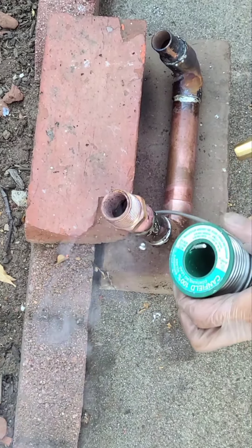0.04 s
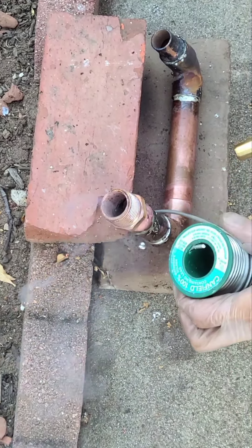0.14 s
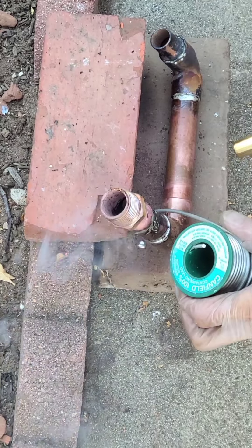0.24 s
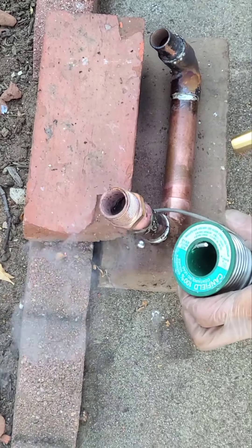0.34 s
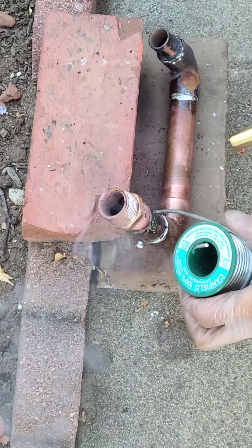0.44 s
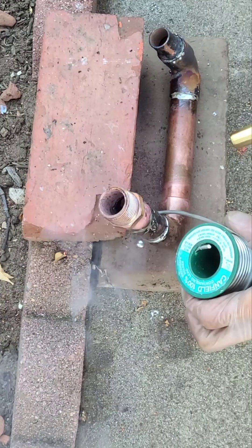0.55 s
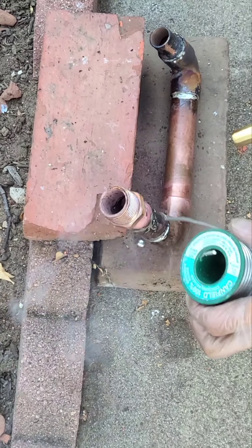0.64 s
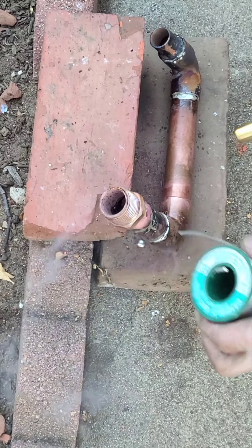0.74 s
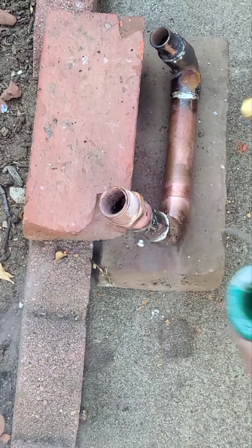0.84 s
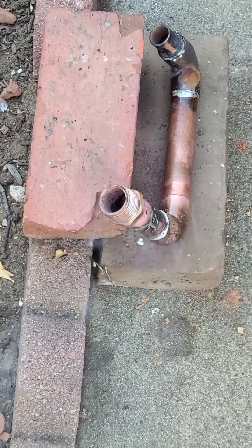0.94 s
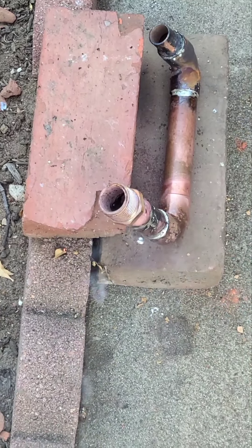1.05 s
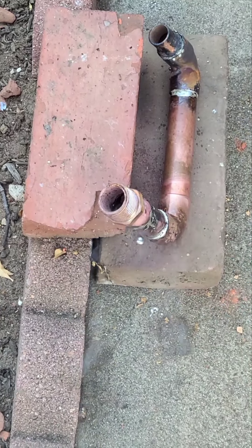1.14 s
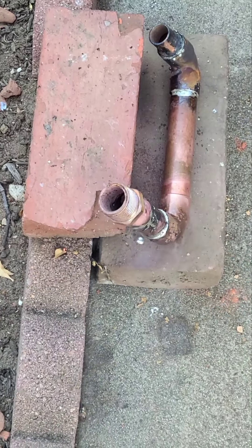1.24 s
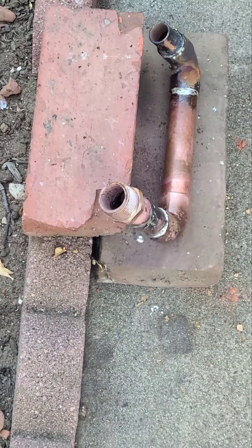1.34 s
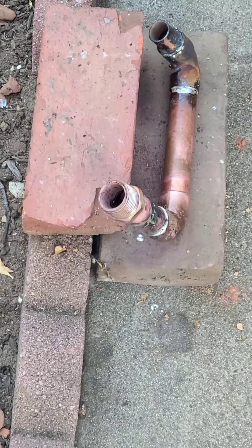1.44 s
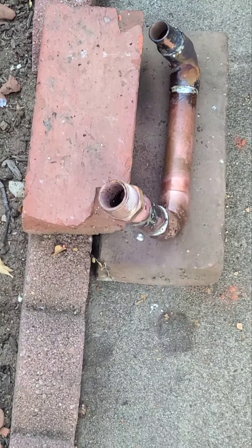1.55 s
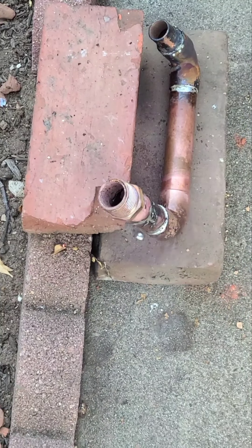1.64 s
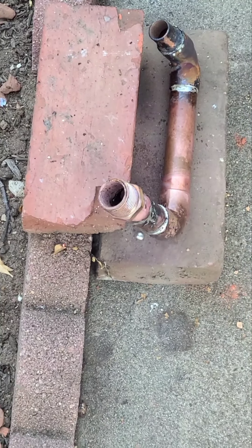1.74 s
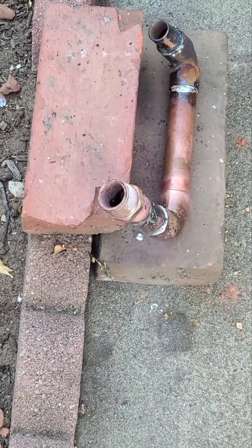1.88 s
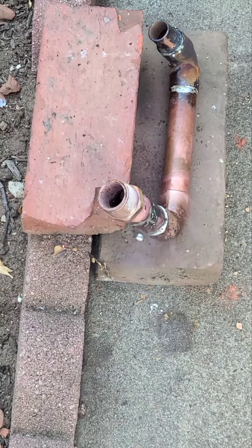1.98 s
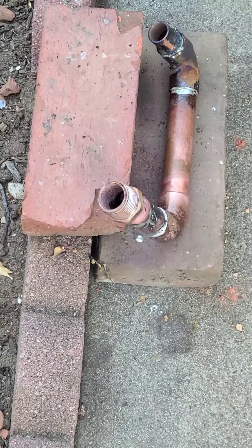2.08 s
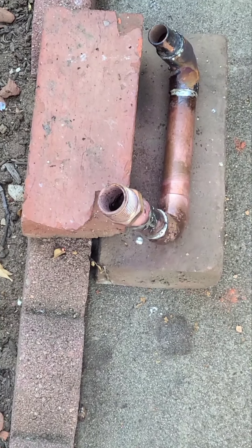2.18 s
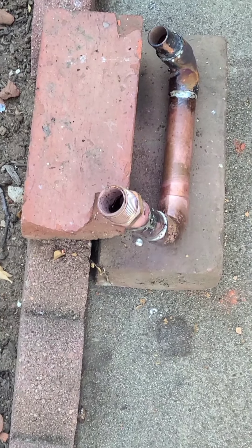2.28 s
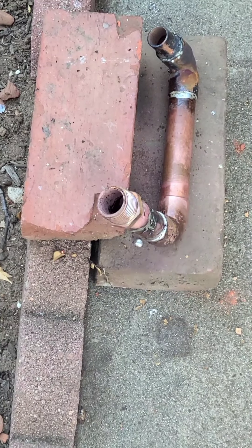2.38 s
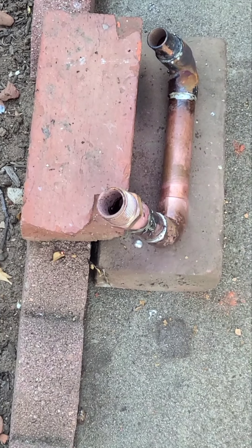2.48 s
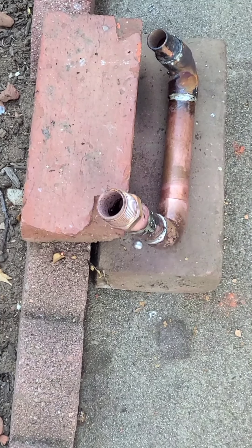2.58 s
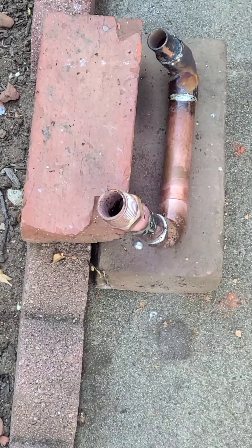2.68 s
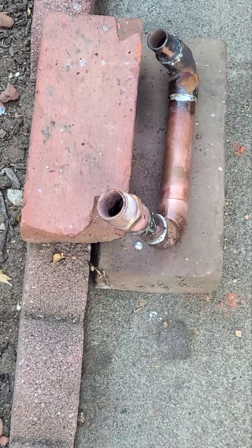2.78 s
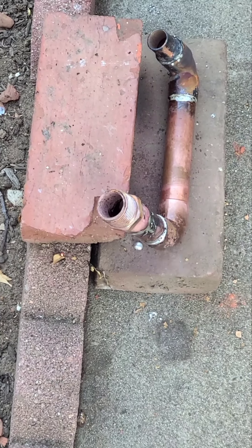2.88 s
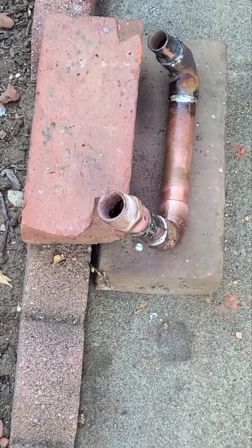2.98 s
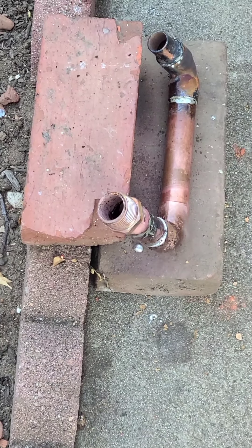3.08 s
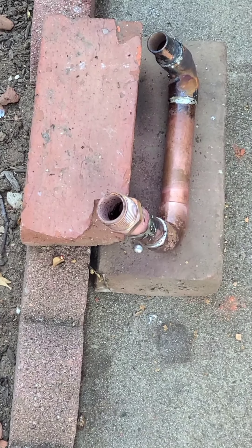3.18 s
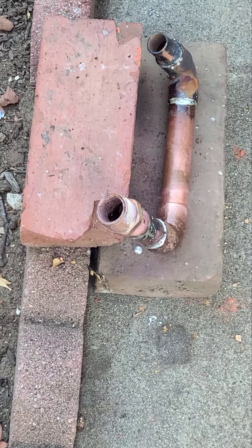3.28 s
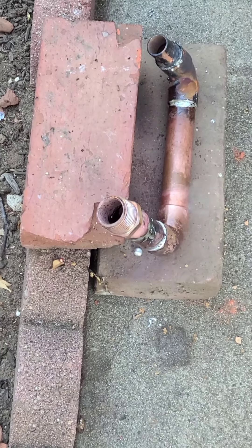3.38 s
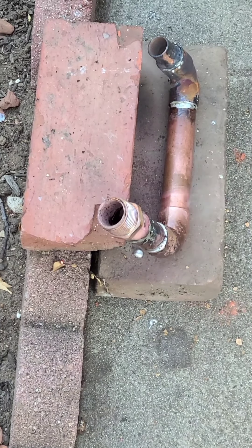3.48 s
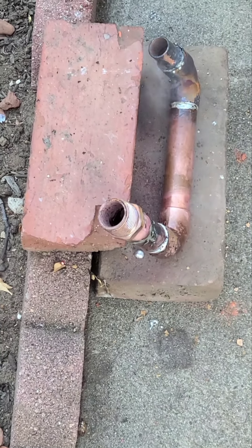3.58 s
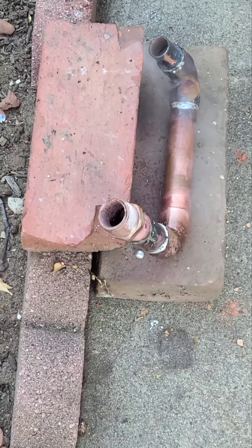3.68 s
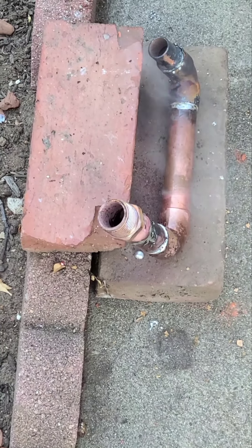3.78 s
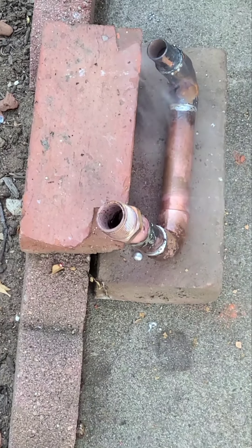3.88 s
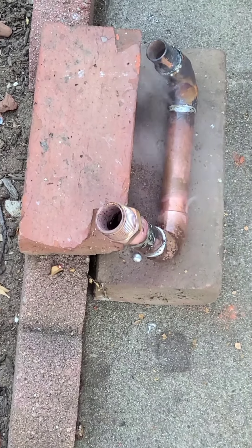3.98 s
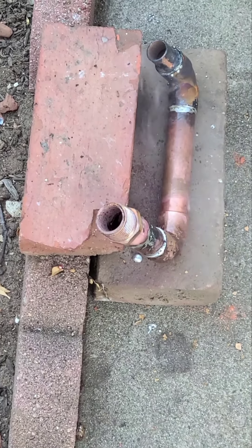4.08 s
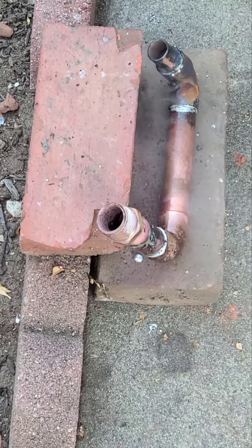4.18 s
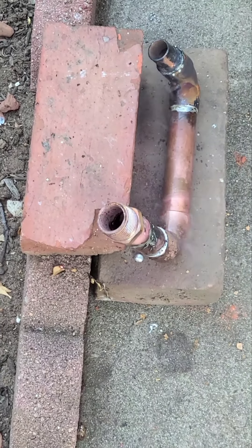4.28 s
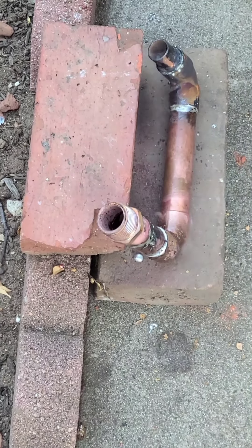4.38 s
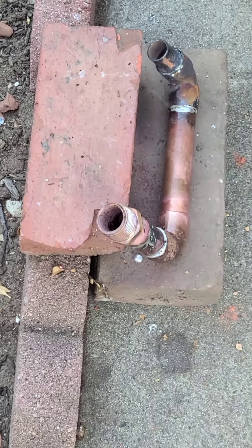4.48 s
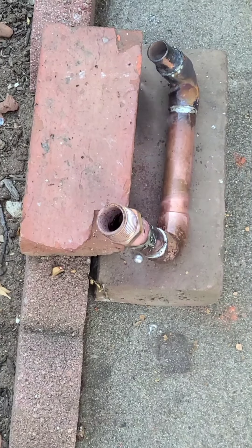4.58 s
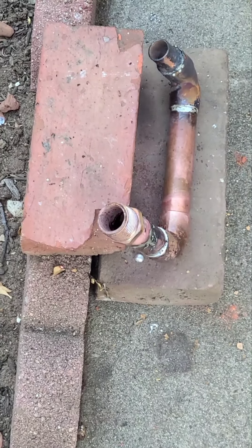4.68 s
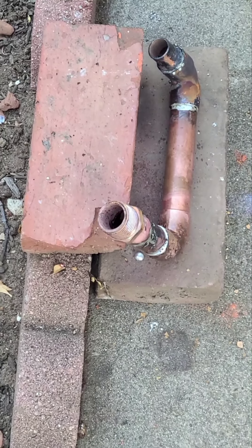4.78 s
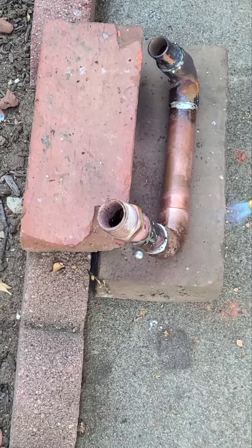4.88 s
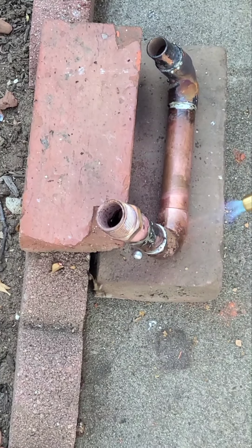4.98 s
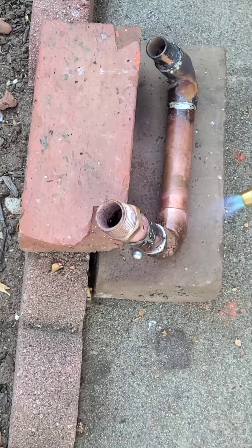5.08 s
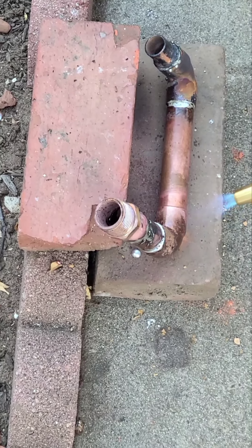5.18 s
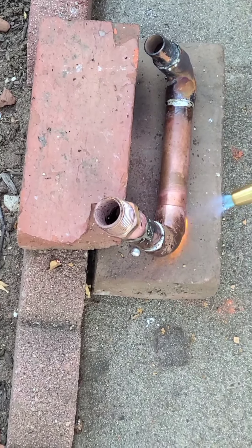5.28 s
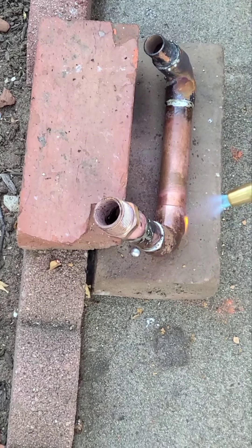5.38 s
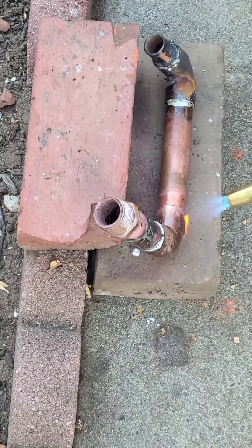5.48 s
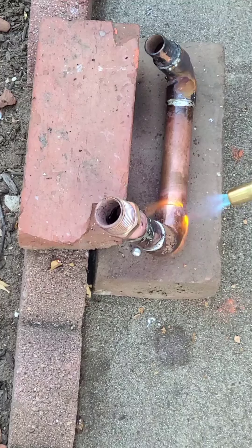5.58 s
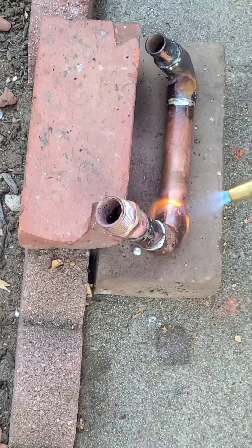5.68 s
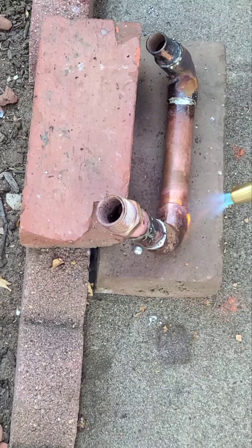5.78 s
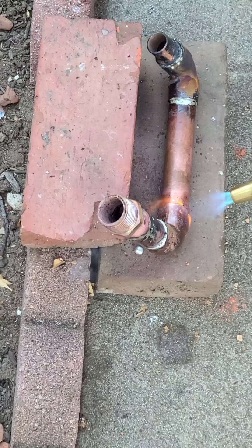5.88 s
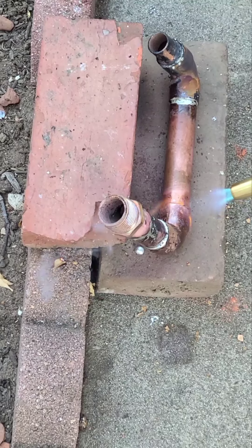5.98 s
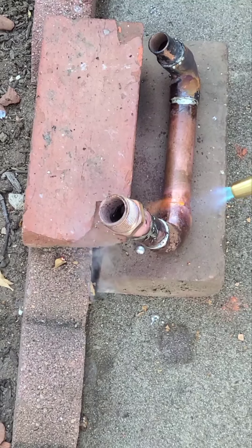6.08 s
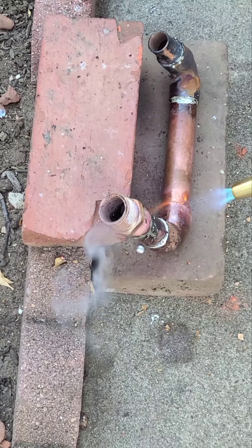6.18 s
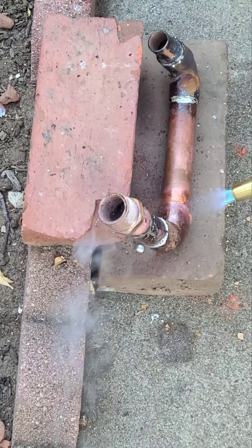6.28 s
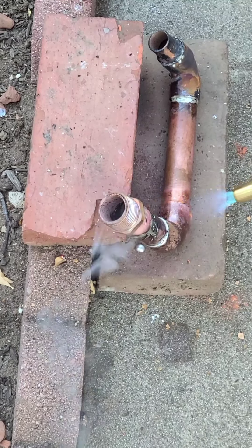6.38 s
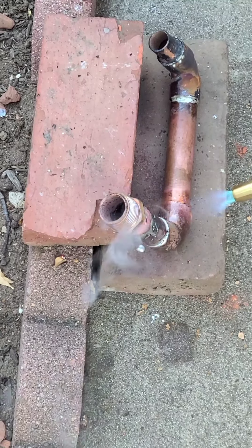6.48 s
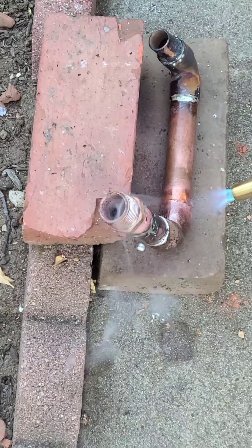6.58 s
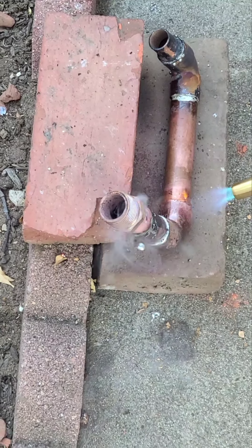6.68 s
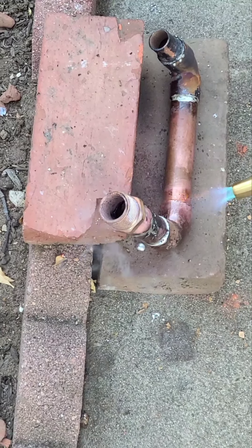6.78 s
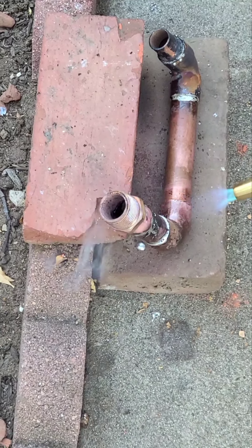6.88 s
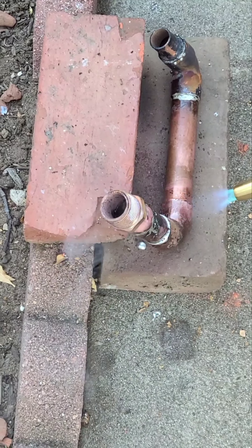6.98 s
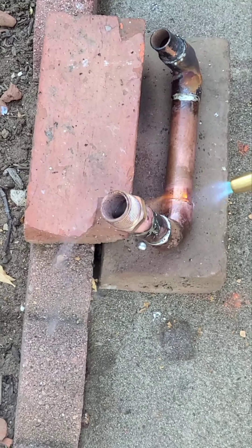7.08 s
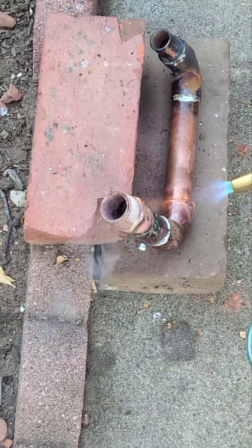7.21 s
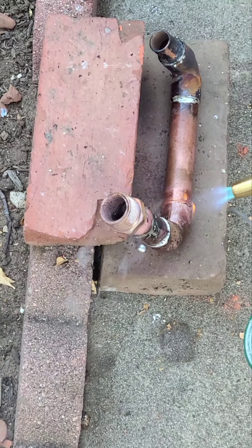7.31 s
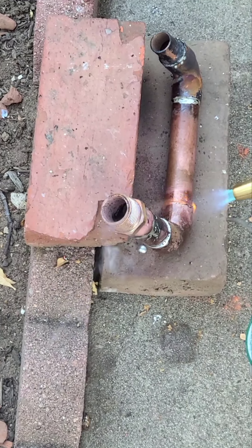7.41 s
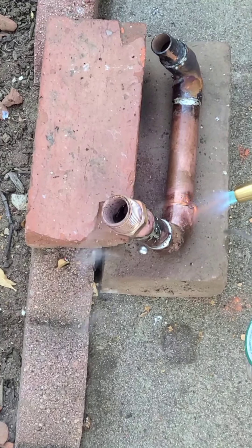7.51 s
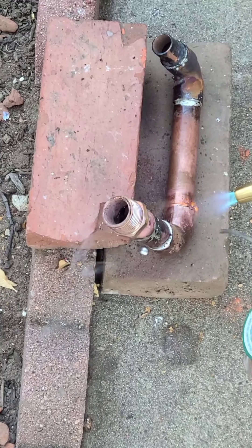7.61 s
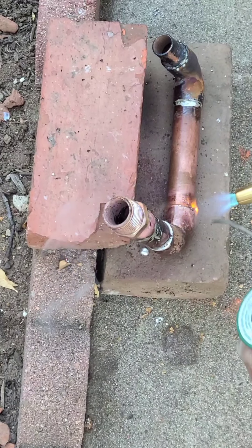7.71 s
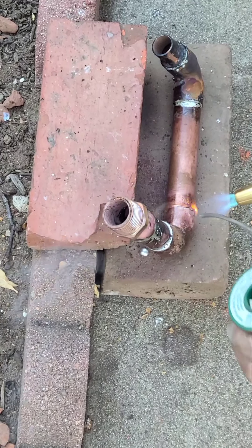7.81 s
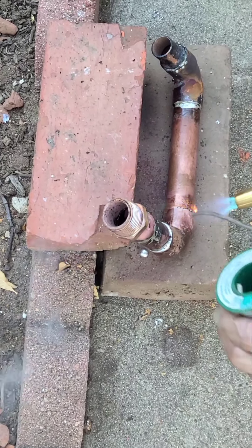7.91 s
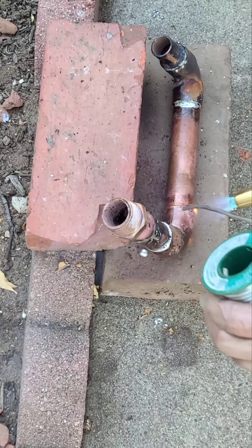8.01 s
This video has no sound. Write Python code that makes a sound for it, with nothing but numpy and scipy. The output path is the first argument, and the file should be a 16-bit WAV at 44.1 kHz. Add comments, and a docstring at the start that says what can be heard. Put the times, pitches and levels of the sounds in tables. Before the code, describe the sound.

Quiet distant traffic rumble, sharp close clatter and small metallic clicks, a thin gas hiss, an igniter snap with a thump, then a loud steady torch roar.

```python
"""A low town rumble comes first, far off and from all sides, as shaped noise with a faint wavering whine.
Close to a stereo pair of microphones, a solder spool clatters down and a gas torch is picked up with clicks:
short noise cracks through resonances, among dry ticks and gritty scuffs. The valve opens with a thin hiss,
the igniter snaps and the gas catches with a thump, a sinking sine. The flame, noise in three bands, grows
louder as it is brought near and roars against a copper joint between a brick and a paving slab."""
import sys
import numpy as np
from scipy import signal
from scipy.fft import rfft, irfft, next_fast_len
from scipy.io import wavfile
from scipy.ndimage import uniform_filter1d

SR = 44100
rng = np.random.default_rng(int(sys.argv[2]) if len(sys.argv) > 2 else 0)


def store_wav(level_fs):
    """Save 16-bit WAV to argv[1]."""
    pcm = np.round(np.clip(np.atleast_2d(level_fs), -1, 1) * 32767)
    wavfile.write(sys.argv[1], SR, pcm.T.astype(np.int16))


N = 355005
TIME = np.arange(N) / SR
HZ = np.fft.rfftfreq(1024, 1 / SR)  # bins of one noise frame
FRAME_S = np.arange(N // 256 + 5) * 256 / SR

# Spectrum of the distant town, relative: [f/Hz, level/dB]
TOWN_SPECTRUM = [(20, -11.5), (59, 1), (169, -13.5), (205, -10), (300, -21.5), (421, -21), (511, -24),
                 (760, -22.5), (1000, -28), (1310, -27.5), (1880, -40), (3010, -45), (4200, -53.5),
                 (15000, -83)]
# The town arrives from all sides of the pair: [f/Hz, left-right likeness 0-1]
TOWN_LIKENESS = [(100, .98), (260, .96), (500, .52), (850, .1), (8000, .15)]
# Far whine that comes and goes: [start t/s, end t/s, final f/Hz, level/dB before the town's channel trim]
WHINE_NOTES = [(2.33, 2.85, 557, -59), (2.88, 3.03, 559, -55), (3.07, 3.14, 560, -51),
               (3.88, 4.03, 571, -56), (4.13, 4.72, 579, -53.5)]
# Very faint background hiss, relative: [f/Hz, level/dB]
FAINT_HISS_SPECTRUM = [(4000, -16.5), (9000, -5.0), (13500, -3.5)]

# Gritty scuffs of handling: [t/s, level/dB before trims, length/s, rasp f/Hz]
SCUFF_EVENTS = [(0.717, -64.5, 0.065, 7000), (2.085, -60, 0.043, 8140), (2.38, -57.5, 0.043, 4040),
                (2.81, -55, 0.045, 7500), (2.898, -63.5, 0.076, 7500), (2.971, -55, 0.045, 3420),
                (3.29, -58, 0.024, 5000), (3.354, -62, 0.062, 7000), (3.782, -56, 0.04, 5220),
                (3.951, -59, 0.3, 8850), (4.137, -57.5, 0.064, 8000)]
# Spectrum of a scuff, relative: [f/Hz, level/dB]
SCUFF_SPECTRUM = [(1000, -27), (3200, 6), (6000, -2), (9000, -4.5), (14500, 3.5)]
# Dry ticks: [t/s, level/dB before the trim, decay/s]
TICK_EVENTS = [(2.3051, -56, .003), (2.354, -58, .002), (2.648, -56.5, .001), (2.9516, -57, .002),
               (2.9701, -57, .003), (3.1937, -55, 0.00091), (3.2857, -56, .002), (3.6326, -30, 0.00075),
               (3.7115, -49, .0008), (3.7196, -40.5, 0.001), (3.7688, -46, .002), (3.889, -31, 0.00066)]
# Body of a tick, relative: [f/Hz, level/dB]
TICK_BODY = [(300, -17), (1000, -6), (1300, 9), (1650, 3), (2200, -13.5), (2950, 2.5), (3500, -12),
             (4400, -6), (5300, -21), (6400, -9), (8300, -19), (10500, -25), (14500, -20)]

# Knocks of the spool: [t/s, level/dB before the trim, low body level/dB, crack decay/s, rattle level/dB,
# left minus right level/dB, contact ring f/Hz, contact ring level/dB]
SPOOL_KNOCKS = [(1.022, -49, -7, 0.0024, 1.5, 5.5, 6500, 8.5),
                (1.2458, -31, 16, 0.0011, -27.5, 1.5, 2900, 14),
                (1.2525, -42, 6, 0.0028, -5.5, 2, 2840, 14), (1.3250, -36, 9.5, 0.0037, -9, -3, 3000, -2.5),
                (1.3332, -12.5, -2, 0.0014, -17, -0.5, 2380, 7),
                (1.3432, -21.5, 2.5, 0.0016, -12.5, -2.5, 7000, 2.5),
                (1.3605, -12, -6.5, 0.0022, -21, 5.5, 6040, 4),
                (1.3642, -17, 1, 0.001, -18, -3.5, 2600, 8.5),
                (1.3742, -23.5, -4, 0.0012, -22.5, -8, 6000, 3),
                (1.3855, -26.5, 1, 0.0016, -19, -13, 14000, -3),
                (1.3948, -23, -1, 0.0033, -22.5, -0.5, 14000, 5),
                (1.4000, -28, 6.5, 0.0017, -13, 6, 12200, -2)]
# Resonances of the spool: [f/Hz, width f/Hz, relative level/dB]
SPOOL_MODES = [(1900, 90, 3), (2330, 260, 9), (2652, 70, 7), (2780, 40, 6), (2860, 330, 8), (2920, 70, 5),
               (4050, 400, 0), (5980, 160, 2), (6988, 70, 5), (7370, 90, 5), (8400, 120, 3),
               (10400, 170, 9), (12208, 110, 16), (13300, 400, 6), (14050, 160, 11), (14400, 200, 12)]
# Ring of the spool after its hardest blow: [f/Hz, relative level/dB, t60 t/s]
SPOOL_RING = [(860, 3, .25), (4247, 0, .33)]
# That blow: [t/s, level/dB]
SPOOL_JOLTS = [(1.3335, -47.5)]
# Clicks of the torch in the hand: same columns and units as SPOOL_KNOCKS
TORCH_CLICKS = [(1.6356, -13.5, -3.5, 0.0015, -24.5, 6, 4530, 6),
                (1.6380, -25, 14.5, 0.00052, -14.5, -3, 6100, 2),
                (1.673, -40.5, 13, 0.002, -4, 1, 2390, -3.5), (1.7046, -26, -8, .001, -19, 6.5, 8300, 4),
                (1.7064, -15, -16.5, 0.0015, -21.5, 8.5, 8100, 7),
                (1.7175, -30, -4.5, .0015, -12, -2, 8000, 0.5),
                (1.7250, -32, -9.5, .0018, -17, 3, 12500, 0), (1.7565, -40, -5, .003, -13, 6, 12000, 1),
                (1.8004, -46, -15, .0014, -19, 8, 11000, 10), (1.811, -52, -10, .002, -13, 4, 12500, 3),
                (1.856, -42.5, -4, 0.0016, -19, 8, 7900, 8), (2.1012, -45.5, -26, .0015, -12, 10, 8150, 7),
                (2.119, -47, 0, .003, -7, 2, 13000, 6), (2.1368, -28.5, -11, 0.0011, -26, 4, 13400, 10),
                (4.0362, -23, -10, 0.0025, -14, 5, 7930, 4), (4.0475, -21, -10.5, 0.0036, -17, 4, 13500, 6)]
# Resonances of the torch: [f/Hz, width f/Hz, relative level/dB]
TORCH_MODES = [(1600, 200, 6), (2650, 250, 5), (3400, 40, 10), (4200, 130, 9), (6100, 70, 8),
               (6950, 110, 11), (8027, 90, 15), (8450, 200, 8), (9800, 250, 8), (10900, 200, 8),
               (12340, 200, 9), (12900, 150, 9), (13700, 500, 5)]
# Burner tube ringing in a close pair of modes: [f/Hz, relative level/dB, t60 t/s]
TUBE_RING = [(3381, 0, .4), (3440, -5, .2)]
# Jolts that set the tube ringing: [t/s, level/dB]
TUBE_JOLTS = [(1.636, -48), (4.04, -58)]
# Dull bumps of things set down and lifted: [t/s, level/dB, low f/Hz, top f/Hz, decay/s]
BUMPS = [(1.022, -40.5, 320, 470, 0.05), (1.6366, -25, 70.2, 700, 0.0064)]

# Igniter snap, relative: [f/Hz, level/dB]
SNAP_SPECTRUM = [(1000, -3.0), (3000, -5.0), (7000, -9.5), (11000, -3), (13500, 1), (15000, -4)]
# Unlit gas blowing across the burner tube, relative: [f/Hz, level/dB]
COLD_GAS_SPECTRUM = [(900, 0), (1850, -12), (2220, 4), (2600, -16), (3250, 4), (3650, -8), (4050, 2),
                     (4400, -5), (4750, 8), (5200, 0), (6750, 5), (8600, 2), (9400, 1), (11500, -3),
                     (13000, 7), (14600, -5)]
# Burning torch, relative within each of its three bands: [f/Hz, level/dB]
FLAME_SPECTRUM = [(20, -49), (55, -10), (140, -9), (270, -4), (425, 3), (700, -5), (1000, -10), (1600, -8),
                  (2200, -12), (3600, -18), (5500, -25), (9000, -25.5), (14500, -28)]
# Flame at the two microphones: [f/Hz, likeness 0-1, left lead/rad]
FLAME_PAIR = [(60, .98, 0), (300, .99, -.12), (600, .96, -.33), (740, .85, -.1), (840, .9, 1.7),
              (1300, .93, .6), (2000, .88, .1), (2600, .8, 1.2), (3500, .76, 1.7), (4150, .65, 1.1),
              (4450, .6, 3.7), (7000, .42, 2.4), (10000, .48, 3.2), (14000, .42, 3.0)]
# Peaks and notches in the flame's noise at each microphone: [f/Hz, width f/Hz, left level/dB, right level/dB]
FLAME_COLOUR = [(82, 58, -4, -0.3), (546, 60, -7, -5.5), (660, 200, -0.5, 7.5), (765, 44, -39, -4),
                (977, 40, 1, -6.5), (1182, 22, 5, 7.5), (1557, 112, 4, -1), (2016, 78, -7, -2.5),
                (2370, 80, 0.5, 6), (2440, 66, -9.5, -4.5), (3095, 156, -8, -1), (3300, 81, 8, 9.5),
                (3780, 53, 10, 5.5), (4070, 310, -4, 4), (4200, 39, -19, 3.5), (5170, 47, 5.5, -5),
                (5460, 280, 0.5, -27), (5870, 35, 6.5, -14), (6175, 82, 8.5, -6), (6530, 50, 2, 17),
                (6580, 235, 2.5, -15), (7840, 110, 5, -5), (8310, 370, -3, -33), (8740, 310, 4, 7),
                (10960, 510, 1.5, -11), (12400, 270, 3, -12)]
# Air resonances of burner and open pipe, blown by the flame: [f/Hz, width f/Hz, level/dB]
PIPE_MODES = [(265, 22, 3), (455, 50, 2.5), (604, 14, 6), (832, 30, 4), (981, 30, 3), (1053, 27, 4.5),
              (1318, 40, 3), (1502, 22, 3), (1847, 38, 4), (2053, 38, 3), (2633, 60, 3)]
# The lit torch is brought up to the joint: [t/s, distance/m]
REACH = [(4.9, 0.25), (5.15, 0.23), (5.6, 0.16), (6.2, 0.14), (8.05, 0.14)]
# The hiss swells and sags as the flame plays over the joint: [t/s, change of level/dB]
HISS_SWEEPS = [(6.35, 1.5), (6.51, -1.5), (6.63, 2), (6.95, 1.5), (7.39, 1.5), (7.58, -2), (7.83, 2.5)]

# Town: level at the start in dB, slow growth in dB per second, and when the growth stops
RUMBLE_DB, RUMBLE_DB_PER_S = -38.5, 0.49
WASH_DB, WASH_DB_PER_S = -50.5, 0.74
TOWN_GROWS_S = 6.2
WHINE_HZ_PER_S, WHINE_FADE_S = 8, .03
LIGHT_S = 4.8603  # the torch lights
FILL_S, SWEEP_S = .04, 0.047  # time constant of the fresh flame filling in; spread of one hiss sweep
# Flame: level in dB at WORK_M, and fall in dB with each doubling of the distance
WORK_M = .15
ROAR_DB, ROAR_FALL_DB = -18.5, 5
RUSH_DB, RUSH_FALL_DB = -23.5, 6
HISS_DB, HISS_FALL_DB = -35.5, 5.5
EDGE_HZ = 14620  # top of the recorded band


def gain_of(db):
    """Amplitude factor of a level in dB."""
    return 10 ** (np.asarray(db) / 20)


def evened(x):
    """Scales to rms 1."""
    return x / np.sqrt(np.mean(x ** 2) + 1e-20)


def read(points, hz, axis=1):
    """One column of a spectrum table, joined on a log-frequency axis."""
    table = np.transpose(points)
    return np.interp(np.log(hz + 1), np.log(table[0] + 1), table[axis])


def add(mix, s, sound):
    """Mixes a stereo sound in at time s."""
    part = mix[:, round(s * SR):][:, :sound.shape[1]]
    part += sound[:, :part.shape[1]]


def band(x, lo_hz, hi_hz):
    """The part of x between two frequencies."""
    size = next_fast_len(N)
    hz = np.fft.rfftfreq(size, 1 / SR)
    kept = (hz >= lo_hz) & (hz < hi_hz)
    return irfft(rfft(x, size) * kept, size)[..., :N]


def drift(rate):
    """Chance of rms 1, joined by straight lines between random points, rate of them a second."""
    return evened(np.interp(TIME * rate, np.arange(4000), rng.standard_normal(4000)))


def patches():
    """Eddies: random patches of rms 1, a few hundred Hz wide and some 50 ms long."""
    z = rng.standard_normal((len(FRAME_S), len(HZ)))
    long = uniform_filter1d(z, size=9, axis=0)
    return evened(uniform_filter1d(long, size=14, axis=1))


def noise_pair(field_db, likeness, lead=0):
    """Noise at two microphones, partly shared, from a field of dB over frames and frequency."""
    a, b, c, d = rng.standard_normal((4, len(FRAME_S), len(HZ)))
    likeness = np.clip(likeness, -1, 1)
    left, stranger = a + 1j * b, c + 1j * d
    right = (likeness * left + np.sqrt(1 - likeness ** 2) * stranger) * np.exp(-1j * lead)
    z = np.array([left, right]) * gain_of(field_db)
    return signal.istft(z.swapaxes(1, 2), nperseg=1024, noverlap=768)[1][:, :N]


def bump(hz, centre_hz, db, octaves=0.19):
    """Gain of one broad resonance, bell-shaped in octaves."""
    return gain_of(db * np.exp(-.5 * (np.log2((hz + 1) / centre_hz) / octaves) ** 2))


def yard(x, wet_db=-15, fade_s=0.027, top_hz=6000):
    """Bricks, slabs and a wall send back sparse early echoes, which ripple the spectrum of a steady sound."""
    t = np.arange(4096) / SR
    signs = rng.choice([-1., 1.], (2, len(t)))
    present = rng.random((2, len(t))) < 2000 / SR  # 2000 echoes a second
    taps = signs * present * (t > .004) * np.exp(-t / fade_s)
    taps = taps + 0.61 * taps[::-1]  # the microphones are close, so they share most echoes
    taps /= np.linalg.norm(taps, axis=1, keepdims=True)
    low_pass = signal.butter(1, min(top_hz, .5 * SR - 1), fs=SR)
    taps = signal.lfilter(*low_pass, taps)  # the echoes are low-passed, so the treble ripples less
    return x + gain_of(wet_db) * signal.oaconvolve(x, taps, axes=1)[:, :N]


def faint_hiss(level_db=-74):
    """A very faint, bright background hiss, independent left and right."""
    return gain_of(level_db) * evened(noise_pair(read(FAINT_HISS_SPECTRUM, HZ), 0))


def whine(waver_hz=3.47, waver_db=0.5):
    """A far machine: its sine note wavers, climbs a little and breaks off."""
    out = np.zeros(N)
    wander, flicker = waver_hz * drift(22), waver_db * drift(20)
    for start, end, hz, db in WHINE_NOTES:
        turns = np.cumsum(hz + WHINE_HZ_PER_S * (TIME - end) + wander) / SR
        gate = np.clip(np.minimum(TIME - start, end - TIME) / WHINE_FADE_S + .5, 0, 1)
        out += np.sqrt(2) * np.sin(2 * np.pi * turns) * gate * gain_of(db + flicker)
    return out


def town(left_db=-0.5, right_db=.5, swell_db=0.44):
    """Distant traffic: a rumble and a soft wash above it, both slowly growing, and one faint whine."""
    air = noise_pair(read(TOWN_SPECTRUM, HZ) + 0.83 * patches(), read(TOWN_LIKENESS, HZ))
    low, high = band(air, 0, 340), band(air, 340, SR)
    growing_s = np.minimum(TIME, TOWN_GROWS_S)
    rumble = evened(low) * gain_of(RUMBLE_DB + RUMBLE_DB_PER_S * growing_s + 0.83 * drift(15))
    wash = evened(high) * gain_of(WASH_DB + WASH_DB_PER_S * growing_s + swell_db * drift(2.41))
    return (rumble + wash + whine()) * gain_of([[left_db], [right_db]])


def scuffs(level_db=1, rasp_db=8, clump=0.28, grains_per_s=2500, rub_db=-3, pan_db=2):
    """Short scrapes: clumps of separate grains of grit over a smooth rub, each with a rasp of its own."""
    out, t = np.zeros((2, N)), np.arange(SR) / SR - .5
    hz = np.fft.rfftfreq(SR, 1 / SR)
    for s, db, length_s, rasp_hz in SCUFF_EVENTS:
        clumps = np.exp(clump * np.interp(t, np.linspace(-.5, .5, num=200), rng.standard_normal(200)))
        grit = evened((rng.random(SR) < grains_per_s / SR) * rng.standard_normal((2, SR)))
        rub = gain_of(rub_db) * rng.standard_normal((2, SR))
        colour = gain_of(read(SCUFF_SPECTRUM, hz)) * bump(hz, rasp_hz, rasp_db, octaves=0.33)
        scrape = irfft(rfft((grit + rub) * clumps) * colour)
        stroke = np.exp(-(2 * t / length_s) ** 2)
        add(out, s - .5, gain_of(db + level_db) * evened(scrape) * stroke)
    return out * gain_of([[pan_db], [-pan_db]])


def ticks(level_db=1.0, tail_db=-27, scatter_db=-5):
    """Dry ticks: one sharp contact, a scatter of grit and a trace of echo, ringing in a hard, dull body."""
    out, t = np.zeros((2, N)), np.arange(8192) / SR
    body = evened(gain_of(read(TICK_BODY, np.fft.rfftfreq(len(t), 1 / SR))))
    # minimum phase, so that the body rings only after the blow
    log_body = np.log(np.r_[body, body[-2:0:-1]])
    causal = np.exp(np.conj(signal.hilbert(log_body)))[:len(body)]
    for s, db, decay_s in TICK_EVENTS:
        burst = rng.standard_normal(len(t)) + 1.7 * rng.standard_normal((2, len(t)))
        burst *= gain_of(scatter_db) * np.exp(-t / decay_s) + gain_of(tail_db) * np.exp(-t / 0.037)
        burst[:, 0] += np.sqrt(decay_s * SR / 2)  # the contact
        add(out, s, gain_of(db + level_db) * irfft(rfft(burst) * causal))
    return out


def knocks(rows, modes, tail_s, direct_db, wall_db, contact=0.14, chatter=0.44):
    """A sharp contact and a short crack with a chattering tail, coloured by resonances of the thing struck."""
    out, t = np.zeros((2, N)), np.arange(24576) / SR
    hz = np.fft.rfftfreq(len(t), 1 / SR)
    resonances = sum(gain_of(db) / (1 + 2j * (hz - f) / width) for f, width, db in modes)
    body = gain_of(direct_db) + resonances
    body = body / np.sqrt(np.mean(abs(body) ** 2))
    body = body * (1j * hz / (1100 + 1j * hz)) ** 2  # small things radiate little bass
    for s, db, low_db, crack_s, rattle_db, pan_db, contact_hz, contact_db in rows:
        # nearby walls return a faint, longer tail
        tail = np.exp(-t / tail_s) + gain_of(wall_db) * np.exp(-t / .05)
        fall = np.exp(-t / crack_s) + gain_of(rattle_db) * tail
        uneven = np.interp(t, np.linspace(0, t[-1], num=400), rng.standard_normal(400))
        bounces = np.where(t > 2 * crack_s, evened(np.exp(chatter * uneven)), 1)
        blow = rng.standard_normal((2, len(t))) * fall * (1 - np.exp(-t / 0.00061)) * bounces
        blow[:, 8] += contact * np.sqrt(crack_s * SR / 2)
        weight = gain_of(low_db / (1 + (hz / 4300) ** 4)) * bump(hz, contact_hz, contact_db)
        sound = irfft(rfft(blow) * body * weight) * np.clip((.5 - t) / .1, 0, 1)
        add(out, s, sound * gain_of([[db + pan_db / 2], [db - pan_db / 2]]))
    return out


def after_ring(modes, jolts):
    """The thin, clean ring that metal keeps after a hard jolt: decaying sines."""
    out, t = np.zeros((2, N)), np.arange(SR) / SR
    for s, db in jolts:
        ring = np.zeros(SR)
        for hz, mode_db, t60 in modes:
            ring += gain_of(mode_db) * np.exp(-np.log(1000) * t / t60) * np.sin(2 * np.pi * hz * t)
        add(out, s, gain_of(db) * ring * np.ones((2, 1)))
    return out


def puff(s, db, low_hz, top_hz, decay_s):
    """A dull burst of noise between two frequencies, alike at both microphones."""
    out, t = np.zeros((2, N)), np.arange(SR // 2) / SR
    between = signal.butter(3, [low_hz, top_hz], "bandpass", fs=SR, output="sos")
    noise = evened(signal.sosfilt(between, rng.standard_normal(SR))[-len(t):])
    shape = (1 - np.exp(-t / 0.0017)) * np.exp(-t / decay_s)
    add(out, s, gain_of(db) * noise * shape * np.ones((2, 1)))
    return out


def thump(db, start_hz, end_hz, decay_s, sink_s):
    """A low push of air that swings a few times, sinking in pitch."""
    t = np.arange(SR // 4) / SR
    turns = np.cumsum(end_hz + (start_hz - end_hz) * np.exp(-t / sink_s)) / SR
    push = np.sin(2 * np.pi * turns) * (1 - np.exp(-t / 0.0031)) * np.exp(-t / decay_s)
    return gain_of(db) * push * np.ones((2, 1))


def handling(spool_db=3, torch_db=3):
    """The spool touches down softly and clatters; the torch is lifted with a dull bump and clicks in the hand."""
    spool = knocks(SPOOL_KNOCKS, SPOOL_MODES, tail_s=0.025, direct_db=-7.0, wall_db=-40.5)
    torch = knocks(TORCH_CLICKS, TORCH_MODES, tail_s=0.023, direct_db=5.5, wall_db=-36.0)
    out = gain_of(spool_db) * spool + gain_of(torch_db) * torch
    add(out, 1.6372, thump(db=-18, start_hz=180, end_hz=100, decay_s=.011, sink_s=0.0038))
    rings = after_ring(SPOOL_RING, SPOOL_JOLTS) + after_ring(TUBE_RING, TUBE_JOLTS)
    return out + rings + sum(puff(*row) for row in BUMPS)


def ignition(snap_db=-11, snap_s=0.0015):
    """The igniter snaps; two milliseconds later the gas in the tube catches with a thump and a low puff."""
    out = puff(4.866, db=-15.5, low_hz=60, top_hz=430, decay_s=.022)
    add(out, 4.8627, thump(db=6, start_hz=320, end_hz=25, decay_s=.0036, sink_s=.0046))
    t = np.maximum(TIME - LIGHT_S, 0)
    snap = evened(noise_pair(read(SNAP_SPECTRUM, HZ), 0.12))
    shape = (t / snap_s) ** 2 * np.exp(2 - 2 * t / snap_s)  # peaks at snap_s
    return out + gain_of(snap_db) * snap * shape


def flame_colour(wander=0.013):
    """Peaks and notches at each microphone; they wander in pitch as the torch sways in the hand."""
    colour = np.zeros((2, len(HZ)))
    for hz, width, left, right in FLAME_COLOUR:
        colour += np.array([[left], [right]]) * np.exp(-.5 * ((HZ - hz) / width) ** 2)
    sway = rng.standard_normal((len(FRAME_S), len(HZ)))
    sway = evened(uniform_filter1d(uniform_filter1d(sway, size=70, axis=0), size=60, axis=1))
    return np.array([np.interp(HZ * (1 + wander * sway), HZ, side) for side in colour])


def catching(dull_db=-11, fill_hz=3500, eddy_db=1, sputter_db=2.0, settle_s=0.47):
    """Field of dB: a fresh flame starts dull and sputters, then fills in and settles to small eddies."""
    age_s = np.maximum(FRAME_S - LIGHT_S, 0)[:, None]
    dull = dull_db * np.exp(-age_s / FILL_S) * np.exp(-2 * np.log2((HZ + 1) / fill_hz) ** 2)
    return dull + (eddy_db + sputter_db * np.exp(-age_s / settle_s)) * patches()


def pipe(x):
    """Lifts each narrow air resonance out of the noise."""
    lifted = x
    for hz, width, db in PIPE_MODES:
        lifted = lifted + (gain_of(db) - 1) * signal.lfilter(*signal.iirpeak(hz, hz / width, SR), x)
    return lifted


def cold_gas(gas_db=-40, spit_db=2.5):
    """Unlit gas: the open valve's jet blows across the tube and spits in random patches."""
    jet = evened(yard(noise_pair(read(COLD_GAS_SPECTRUM, HZ) + spit_db * patches(), 0.16)))
    valve = np.clip((TIME - 4.701) / 0.029, 0, 1)
    return valve * jet * gain_of([[gas_db + 4.0], [gas_db - 0.5]])


def flame(flutter_db=.5, surge_db=0.65, fizz_db=0.56, roar_catch_s=0.015, rush_catch_s=0.015):
    """Turbulent burning roars low and rushes higher up; the gas jet hisses above both, even before it is lit."""
    field_db = read(FLAME_SPECTRUM, HZ) + flame_colour() + catching()
    likeness, lead = read(FLAME_PAIR, HZ), read(FLAME_PAIR, HZ, axis=2)
    stream = pipe(yard(noise_pair(field_db, likeness, lead)))
    # each band is levelled by a core range of the two microphones' mean
    mid = stream.mean(0)
    roar = band(stream, 0, 900) / band(mid, 200, 800).std()
    rush = band(stream, 900, 4500) / band(mid, 1000, 3000).std()
    hiss = band(stream, 4500, SR) / band(mid, 6000, 14000).std()
    burning_s = np.maximum(TIME - LIGHT_S, 0)
    lit = 1 - np.exp(-burning_s / roar_catch_s)
    rush_lit = 1 - np.exp(-burning_s / rush_catch_s)
    distance_m = np.interp(TIME, *np.transpose(REACH))
    doublings = np.log2(np.maximum(distance_m / WORK_M, .1))
    flutter = flutter_db * drift(70)  # the flame front flaps, shaking roar and rush together
    sweeps = sum(db * np.exp(-.5 * ((TIME - s) / SWEEP_S) ** 2) for s, db in HISS_SWEEPS)
    roar = roar * gain_of(ROAR_DB - ROAR_FALL_DB * doublings + flutter + surge_db * drift(18))
    rush = rush * gain_of(RUSH_DB - RUSH_FALL_DB * doublings + flutter) * rush_lit
    hiss = hiss * gain_of(HISS_DB - HISS_FALL_DB * doublings + sweeps + fizz_db * drift(40))
    return lit * (roar + rush + hiss) + (1 - lit) * cold_gas()


def scene():
    """Everything that reaches the pair, from the background to the flame."""
    return faint_hiss() + town() + scuffs() + ticks() + handling() + ignition() + flame()


def record(dry, low_cut_hz=39):
    """The microphone drops the deepest bass, peaks stop at full scale; then the band limit."""
    low_cut = signal.butter(4, low_cut_hz, "highpass", fs=SR, output="sos")
    edge = signal.firwin(1023, EDGE_HZ, window=("kaiser", 7), fs=SR)
    limited = np.clip(signal.sosfilt(low_cut, dry), -1, 1)
    return signal.oaconvolve(limited, edge[None], "same")


dry = scene()
out = record(dry)
store_wav(out)
```